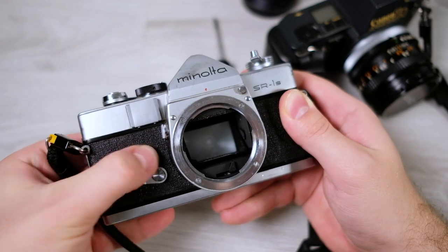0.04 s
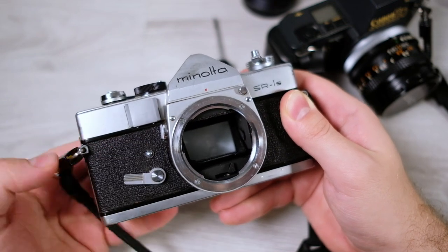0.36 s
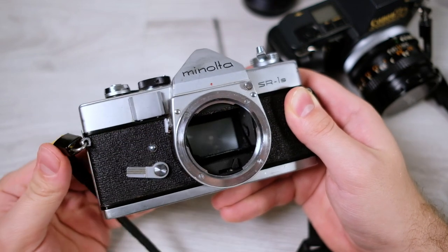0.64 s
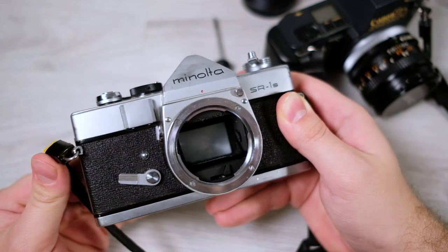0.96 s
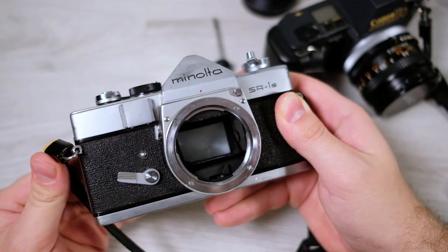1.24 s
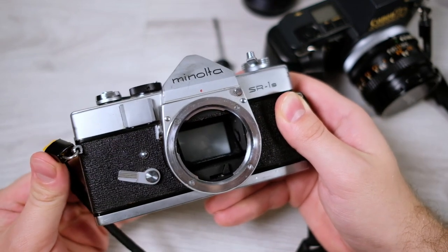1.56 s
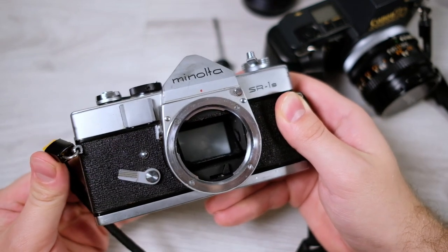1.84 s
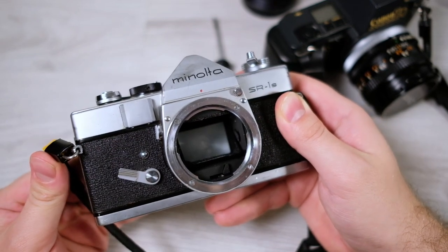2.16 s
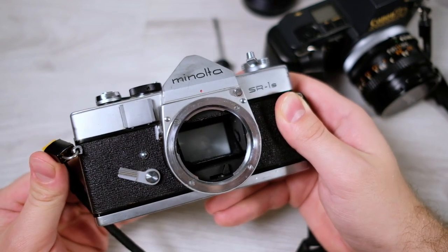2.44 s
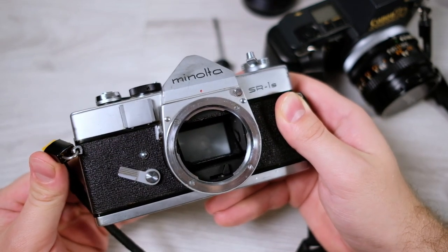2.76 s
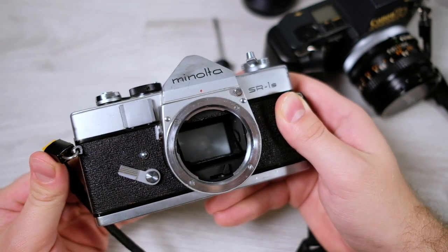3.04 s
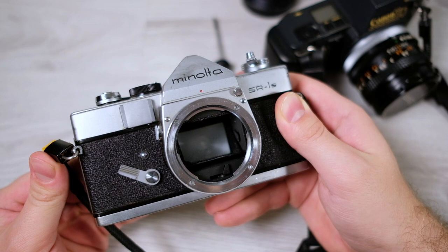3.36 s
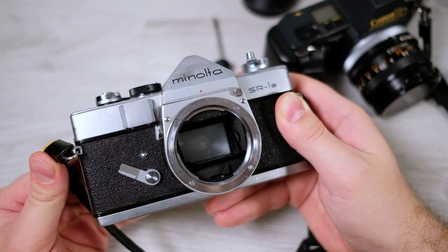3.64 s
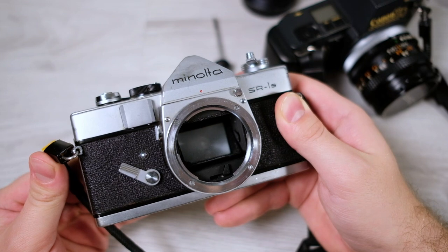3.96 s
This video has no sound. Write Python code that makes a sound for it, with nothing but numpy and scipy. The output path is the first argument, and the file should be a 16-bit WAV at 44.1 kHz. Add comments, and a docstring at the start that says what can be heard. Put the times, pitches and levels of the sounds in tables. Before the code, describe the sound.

An old camera's wind-up self-timer runs steadily close to the microphone, its tiny gears making a thin, bright, slightly uneven whir. Beneath it lie quiet room tone and a barely audible rub of fingers.

```python
"""A quiet room, one microphone close to an old hand-held camera as its clockwork self-timer runs down.
The escapement rocks about 170 times a second; each contact of the pallets rings the case, the gear
plate and the small steel parts. Uneven gears make speed and force flutter, and the ring changes as
the left hand closes on the body. Under the whir lie room rumble, faint mains hum and the rub of hands."""
import sys
import numpy as np
from scipy import signal
from scipy.fft import rfft, irfft, next_fast_len
from scipy.io import wavfile
from scipy.ndimage import map_coordinates

SR = 44100
rng = np.random.default_rng(int(sys.argv[2]) if len(sys.argv) > 2 else 0)


def persist_wave(psi):
    """Save psi, clipped to +-1, as 16-bit WAV."""
    counts = np.round(np.clip(psi, -1, 1) * 32767).astype(np.int16)
    wavfile.write(sys.argv[1], SR, np.atleast_2d(counts).T)


N = 176400
TIME = np.arange(N) / SR
BEAT_HZ = 171.5  # swings of the anchor a second


def amp(db):
    """Decibels to gain."""
    return 10 ** (np.asarray(db) / 20)


def unit(x):
    """Scale to rms 1."""
    return x / np.sqrt(np.mean(x ** 2) + 1e-20)


def fader(rows, trim_db=0):
    """One gain per sample from (time [s], level [dB]) rows, plus a trim."""
    return amp(trim_db + np.interp(TIME, *np.transpose(rows)))


def wobble(knot_hz):
    """A smooth random curve with knot_hz knots a second."""
    knots = rng.standard_normal(int(N * knot_hz / SR) + 4)
    return map_coordinates(knots, [TIME * knot_hz])


def filtered(x, response):
    """Pass x through a complex response, given as a function of frequency."""
    size = next_fast_len(N + SR // 2)
    return irfft(rfft(x, size) * response(np.fft.rfftfreq(size, 1 / SR)), size)[:N]


def ring(x, modes, size=16384):
    """x through a body with these resonances, at rms 1; the body answers a blow at once."""
    f = np.fft.rfftfreq(size, 1 / SR)
    power = sum(np.abs(amp(db) * f * width / (hz * hz - f * f + 1j * f * width)) ** 2
                for hz, width, db in modes)
    cepstrum = irfft(np.log(power + 1e-10) / 2)
    cepstrum[1:size // 2] *= 2  # fold to minimum phase
    cepstrum[size // 2 + 1:] = 0
    impulse_response = irfft(np.exp(rfft(cepstrum)))
    return unit(signal.fftconvolve(x, impulse_response)[:N])


def room_tone():
    """The room itself: steady air, mains hum and a low resonance that swells and sinks."""
    # spectrum of the air: (frequency [Hz], relative density [dB])
    air_spectrum = [(20, -1), (45, -4), (75, -10), (110, -3), (170, -6.5), (300, -7), (400, -11.5),
                    (550, -10), (750, -13.5), (1000, -22), (2000, -21)]
    # hum tones: (frequency [Hz], level [dB])
    hum_tones = [(100, -74), (120, -74.5), (205, -79)]
    # room resonance: (frequency [Hz], width [Hz], relative level [dB])
    rumble_mode = [(46.4, 4, 0)]
    # its swells: (time [s], relative level [dB])
    rumble_level = [(0, -82), (.45, -77), (.78, -69.5), (1.3, -75), (2.0, -69.5), (2.35, -64.5),
                    (2.9, -70.5), (3.8, -71), (4, -76)]
    hz, db = np.transpose(air_spectrum)
    air = filtered(rng.standard_normal(N), lambda f: amp(np.interp(np.log(f + 1), np.log(hz + 1), db)))
    hum = sum(np.sqrt(2) * amp(level) * np.sin(2 * np.pi * (f * TIME + rng.random()))
              for f, level in hum_tones)
    rumble = fader(rumble_level, trim_db=2.5) * ring(rng.standard_normal(N), rumble_mode)
    return amp(-62.5) * unit(air) + hum + rumble


def reflections(x, t60_s=.11):
    """A short, dry tail from the table and the walls, 2 ms behind the direct sound."""
    t = TIME[:SR // 4]
    tail = rng.standard_normal(len(t)) * amp(-60 * t / t60_s) * (t > .002)
    return signal.fftconvolve(x, tail / np.linalg.norm(tail))[:N]


def handling_noise():
    """Fingers shift on the camera body: soft, dull swells of rubbing skin."""
    # finger movements: (time [s], half length [s], peak level [dB])
    rubs = [(0.918, 0.24, -64.5), (1.54, .05, -64), (2.004, 0.027, -59)]
    # colour of skin on the body: (frequency [Hz], width [Hz], relative level [dB])
    skin_modes = [(120, 83, 2), (237, 140, 3), (335, 79, 5)]
    swells = sum(amp(db) * np.exp(-((TIME - at_s) / half_s) ** 2) for at_s, half_s, db in rubs)
    return swells * ring(rng.standard_normal(N), skin_modes)


def closing_grip(x, free_modes, held_modes, from_s=.44, to_s=1.2):
    """The ring passes from free to held modes as the left hand closes on the body."""
    grip = np.interp(TIME, [from_s, to_s], [0, 1])
    free, held = ring(x, free_modes), ring(x, held_modes)
    blend_power = 1 - 2 * grip * (1 - grip) * (1 - np.mean(free * held))
    return ((1 - grip) * free + grip * held) / np.sqrt(blend_power)


def case_ring(drive, late_hz=2730, width_hz=910):
    """The thin case rings; bending waves near late_hz lag, smearing each knock over about 1 ms."""
    # modes of the case: (frequency [Hz], width [Hz], relative level [dB])
    case_modes = [(840.0, 143.0, -20.5), (1127.0, 29.0, -19.5), (1556.0, 49.0, -15.0), (1704.0, 77.0, -8.5),
                  (1851.0, 37.0, -12.0), (2047.0, 46.0, -10.5), (2218.0, 37.0, -8.0), (2328.0, 48.0, -5.0),
                  (2441.0, 24.0, -11.5), (2567.0, 80.0, -6.0), (2812.0, 47.0, 0.0), (2926.0, 80.0, -0.0),
                  (3052.0, 35.0, -4.5), (3180.0, 143.0, -8.5), (3459.0, 33.0, -11.5)]
    # strength of their ring: (time [s], relative level [dB])
    case_level = [(0, -40.5), (.08, -37), (.16, -34.5), (.5, -34.5), (1.0, -34.5), (1.6, -34.5), (2.2, -35),
                  (2.5, -36), (3.2, -33.5), (3.6, -36), (4, -35)]
    pole = lambda f: late_hz ** 2 - f * f + 1j * f * width_hz
    smeared = filtered(drive, lambda f: np.conj(pole(f)) / pole(f))  # all-pass: the colour stays
    return fader(case_level, trim_db=-2.5) * ring(smeared, case_modes)


def damped_case_ring(drive):
    """One case mode sounds for about the first second, until the grip damps it."""
    # the mode: (frequency [Hz], width [Hz], relative level [dB])
    damped_mode = [(3490, 190, 0)]
    # its fall under the hand: (time [s], level [dB])
    damped_level = [(0, -41), (.15, -48), (.4, -44), (.7, -46), (1.1, -68), (1.5, -68)]
    return fader(damped_level) * ring(drive, damped_mode)


def plate_ring(drive):
    """The gear plate rings at about 4-9 kHz; its modes shift with the grip."""
    # plate modes, left hand off, then on: (frequency [Hz], width [Hz], relative level [dB])
    free_modes = [(3950.0, 344.0, -6.5), (4490.0, 143.0, -2.0), (4998.0, 120.0, -5.5),
                  (5404.0, 197.0, -5.5), (5926.0, 155.0, -11.0), (6628.0, 120.0, -3.5),
                  (7161.0, 299.0, 0.0), (7879.0, 372.0, -9.0), (8546.0, 120.0, -14.0),
                  (8976.0, 120.0, -9.5)]
    held_modes = [(3807.0, 145.0, -3.0), (4144.0, 309.0, -6.0), (5147.0, 295.0, -1.0),
                  (5983.0, 122.0, -6.5), (6784.0, 229.0, 0.0), (7154.0, 271.0, -0.5), (7850.0, 599.0, -9.5),
                  (8694.0, 155.0, -11.0)]
    # strength of their ring: (time [s], relative level [dB])
    plate_level = [(0, -46), (.09, -45.5), (.14, -44), (.6, -44), (1.6, -43.5), (2.6, -44), (4, -43.8)]
    return fader(plate_level, trim_db=-.5) * closing_grip(drive, free_modes, held_modes)


def steel_ring(drive):
    """The small steel parts ring at about 10-16 kHz; their modes shift with the grip."""
    # steel modes, left hand off, then on: (frequency [Hz], width [Hz], relative level [dB])
    free_modes = [(9889.0, 120.0, -5.5), (10400.0, 740.0, -4.0), (10832.0, 321.0, -5.0),
                  (11396.0, 347.0, -7.5), (12091.0, 159.0, 0.0), (12420.0, 172.0, -3.0),
                  (12905.0, 526.0, -1.5), (13491.0, 227.0, -9.0), (13958.0, 236.0, -6.5),
                  (14590.0, 345.0, -9.0), (15516.0, 274.0, -14.0)]
    held_modes = [(9900.0, 488.0, -0.5), (10304.0, 225.0, 0.0), (10853.0, 196.0, -2.0),
                  (11335.0, 311.0, -3.5), (12267.0, 433.0, -2.0), (12745.0, 169.0, -4.5),
                  (13065.0, 153.0, -1.0), (13801.0, 362.0, -1.0), (14450.0, 385.0, -11.0),
                  (15573.0, 192.0, -10.5)]
    # strength of their ring: (time [s], relative level [dB])
    steel_level = [(0, -43), (.3, -43.5), (.8, -43.5), (1.2, -44), (2.2, -44), (2.8, -45), (4, -44)]
    return fader(steel_level, trim_db=1) * closing_grip(drive, free_modes, held_modes)


def anchor_swings(drift_share=.018, scatter_db=.37):
    """Start [s] and force [dB] of every swing of the anchor, driven through the uneven gears."""
    # uneven wheels: (rate [turns/s], first peak [s], speed ripple [share], force ripple [dB])
    gears = [(1.5737, .29, .008, 0.26), (3.472, .181, 0.011, 0.29), (6.875, .008, .01, 0.25),
             (7.76, .03, .035, 0.01), (14.673, .047, .035, -0.18), (63.18, .015, .04, -1.5)]
    ripple = np.array([np.cos(2 * np.pi * hz * (TIME - peak_s)) for hz, peak_s, _, _ in gears])
    _, _, speed_ripple, force_ripple_db = np.transpose(gears)
    rate_hz = BEAT_HZ * (1 + speed_ripple @ ripple + drift_share * wobble(knot_hz=25))
    swing_count = np.cumsum(rate_hz) / SR
    starts = np.interp(np.arange(int(swing_count[-1])), swing_count, TIME)
    force_db = np.interp(starts, TIME, force_ripple_db @ ripple)
    return starts, force_db + scatter_db * rng.standard_normal(len(starts))


def escapement(jitter_s=.00009, scatter_db=1.1, one_way_bias=.55):
    """Each contact is a knock and a short slide of pallet on tooth; gives drives for case, plate, steel."""
    # contacts in one swing: (place in the swing [0-1], slide [s], case [dB], plate [dB], steel [dB])
    contacts = [(0, 0.00078, 3, -4.5, 0.5), (.24, .0008, -4, -24.5, -20), (.43, .0006, -3.5, 2.5, 2.5),
                (.6, 0.0013, -5.5, 1.5, -4.5)]
    force_follow = (.47, 1, 1)  # the heavy case follows only part of each change of force in dB
    slide_share = np.array([[.15], [.9], [.7]])  # power in sliding noise; the rest is clean knock
    starts, swing_db = anchor_swings()
    knocks, slide_power = np.zeros((2, 3, N))
    for place, slide_s, *part_db in contacts:
        late, hard, push = rng.standard_normal((3, len(starts)))
        contact_s = starts + place / BEAT_HZ + jitter_s * late
        at = np.clip(contact_s * SR, 0, N).astype(int)
        blow_db = swing_db + scatter_db * hard
        direction = np.sign(push + one_way_bias)
        blows = np.array([np.bincount(at, direction * amp(db + follow * blow_db), N + 1)[:N]
                          for db, follow in zip(part_db, force_follow)])
        knocks += blows
        slide_samples = slide_s * SR
        slide_power += signal.lfilter([1], [1, -np.exp(-1 / slide_samples)], blows ** 2) / slide_samples
    grit = rng.standard_normal((3, N))
    return np.sqrt(1 - slide_share) * knocks + np.sqrt(slide_share * slide_power) * grit


def self_timer(bass_cut_hz=640):
    """The escapement rings the camera's parts; the small body gives off almost no bass."""
    case, plate, steel = escapement()
    whir = case_ring(case) + damped_case_ring(plate) + plate_ring(plate) + steel_ring(steel)
    return signal.sosfilt(signal.butter(2, bass_cut_hz, "high", fs=SR, output="sos"), whir)


def scene():
    """The whir close up, in mono, with the room's reflections well below it."""
    whir = self_timer()
    return (whir + amp(-15) * reflections(whir) + room_tone() + handling_noise())[None]


def record(dry):
    """The microphone channel keeps nothing above its band limit."""
    top_hz = 15770
    return np.array([filtered(x, lambda hz: hz < top_hz) for x in dry])


dry = scene()
out = record(dry)
persist_wave(out)
```